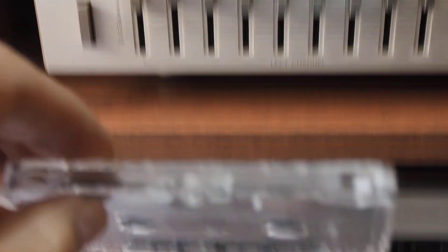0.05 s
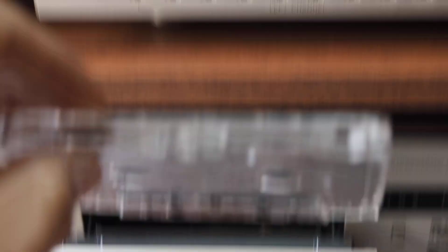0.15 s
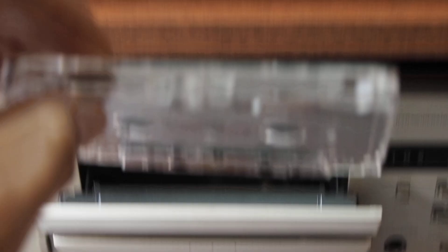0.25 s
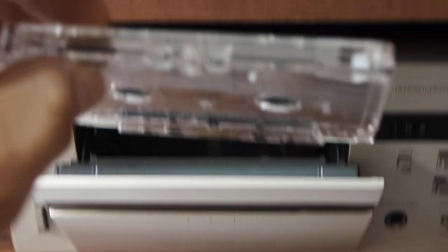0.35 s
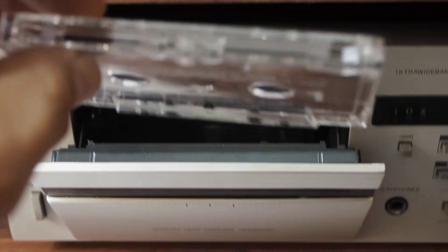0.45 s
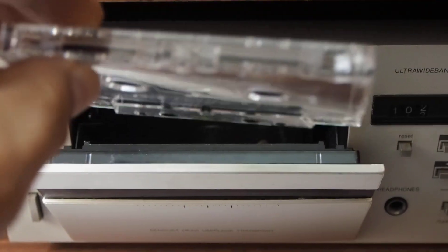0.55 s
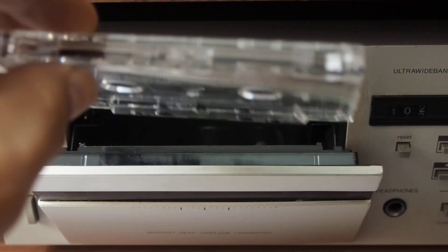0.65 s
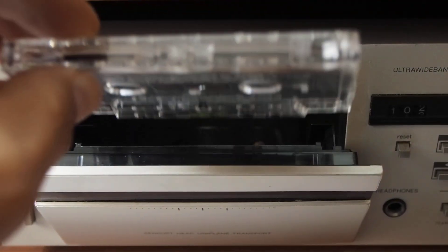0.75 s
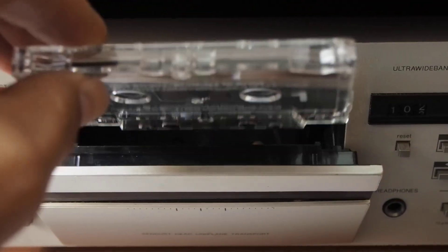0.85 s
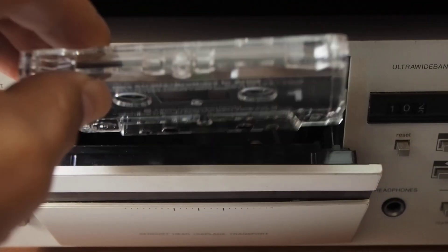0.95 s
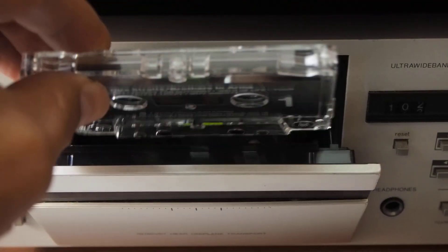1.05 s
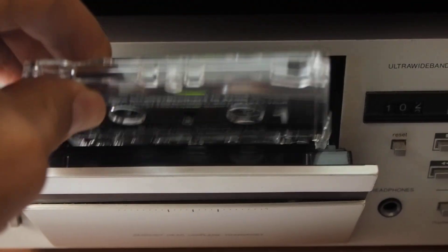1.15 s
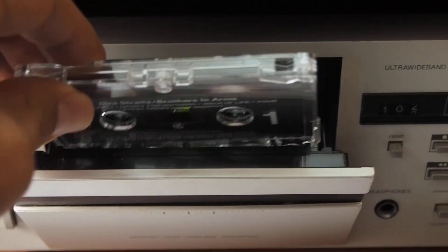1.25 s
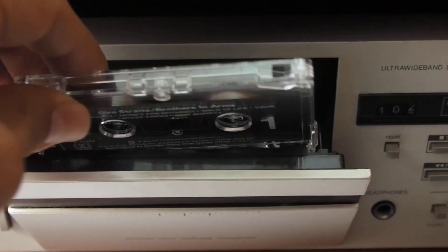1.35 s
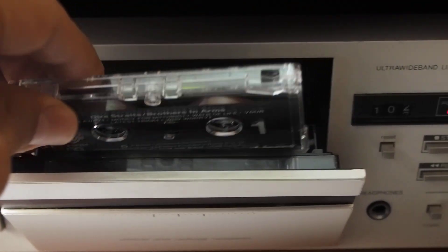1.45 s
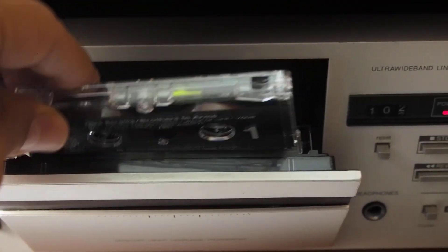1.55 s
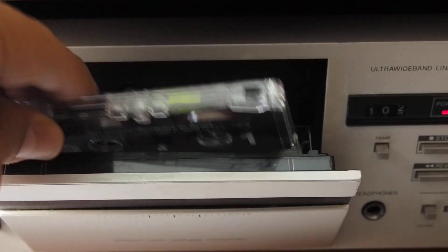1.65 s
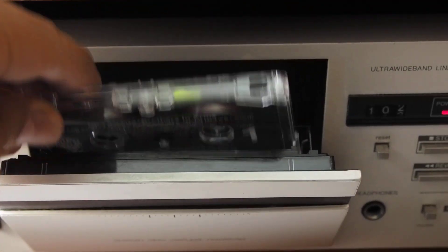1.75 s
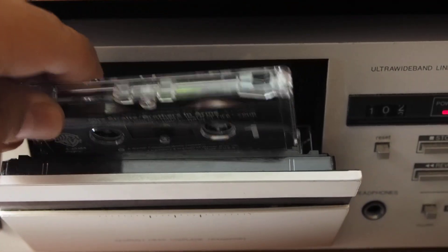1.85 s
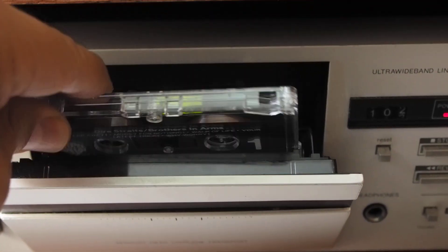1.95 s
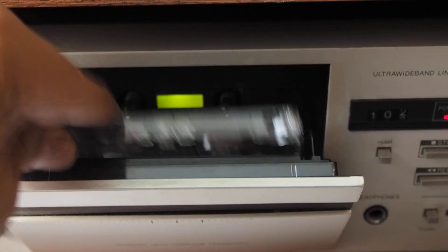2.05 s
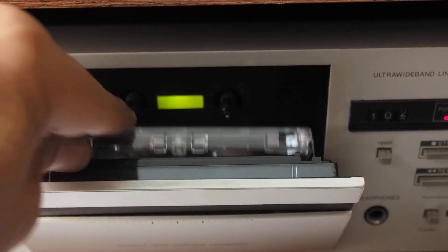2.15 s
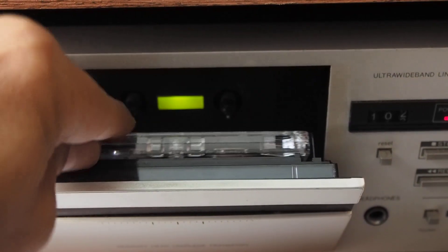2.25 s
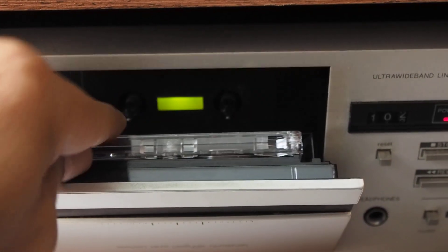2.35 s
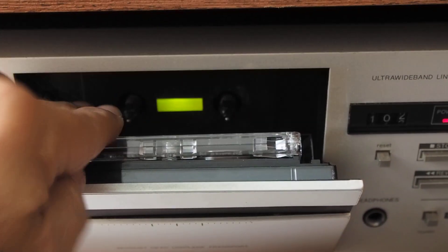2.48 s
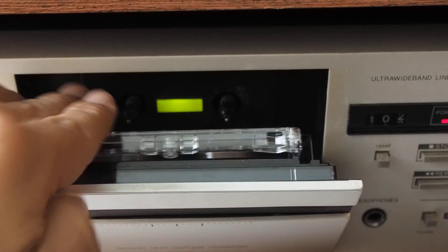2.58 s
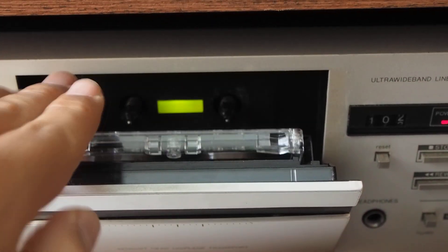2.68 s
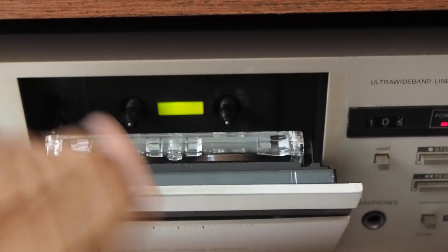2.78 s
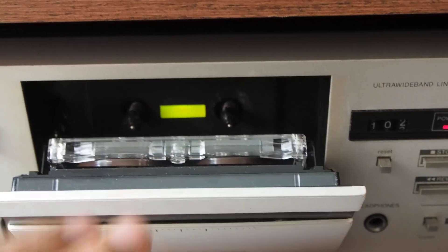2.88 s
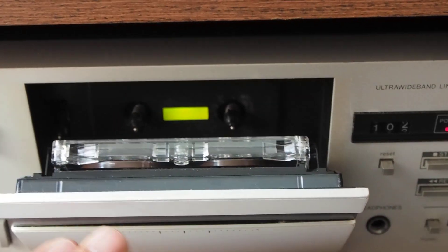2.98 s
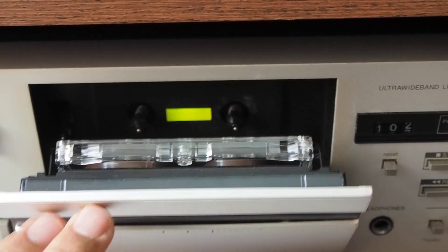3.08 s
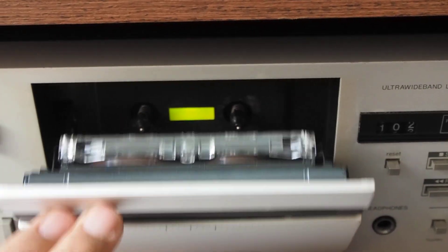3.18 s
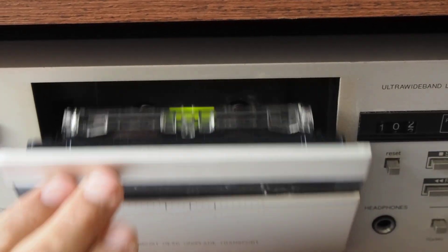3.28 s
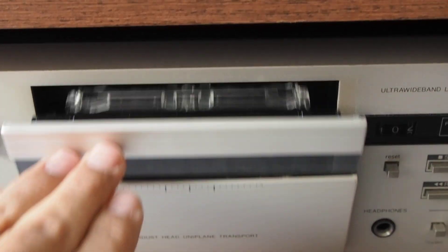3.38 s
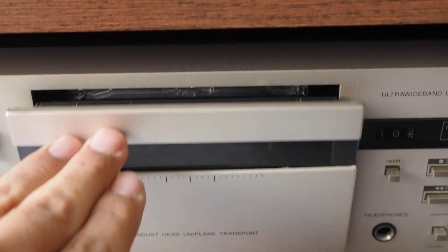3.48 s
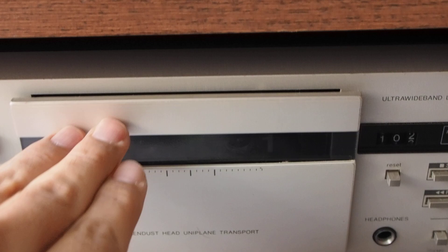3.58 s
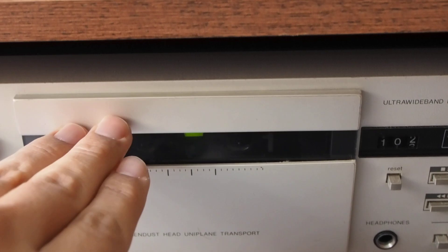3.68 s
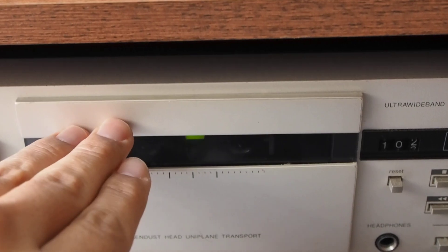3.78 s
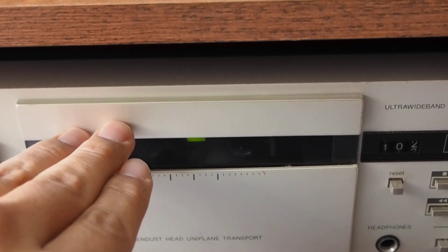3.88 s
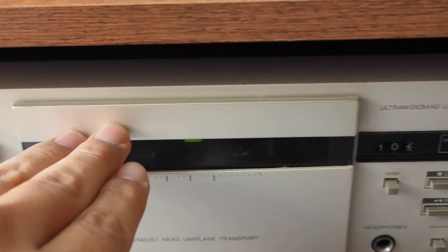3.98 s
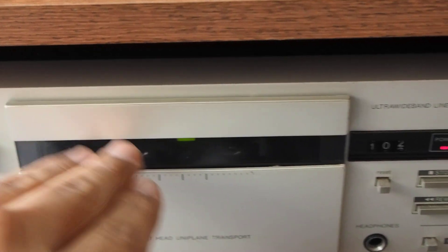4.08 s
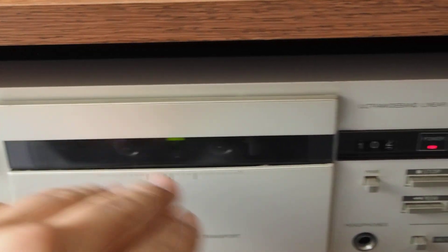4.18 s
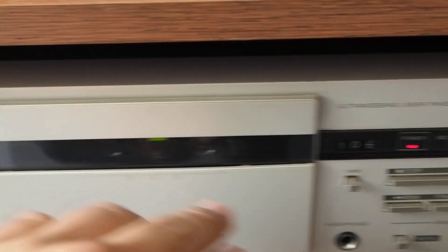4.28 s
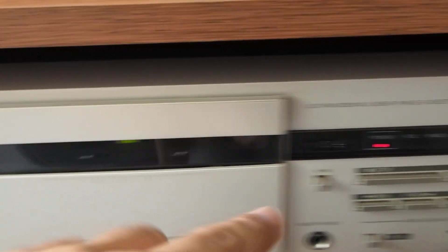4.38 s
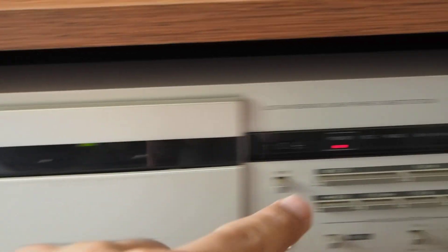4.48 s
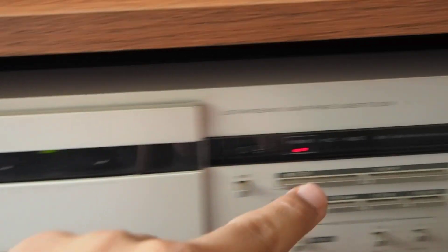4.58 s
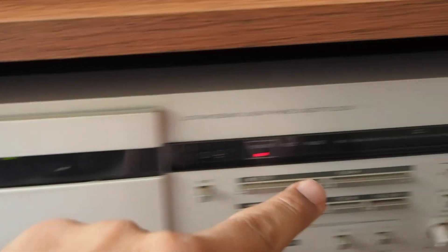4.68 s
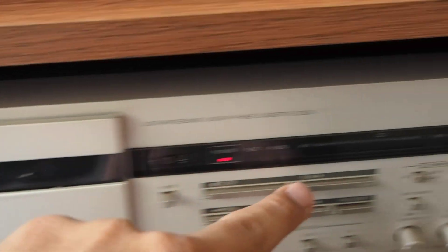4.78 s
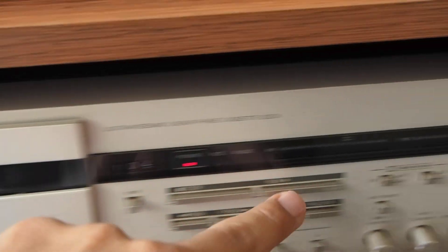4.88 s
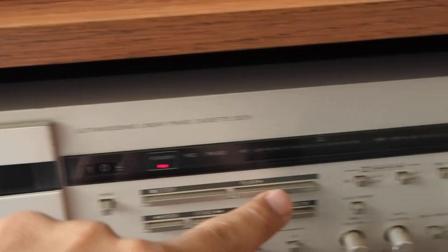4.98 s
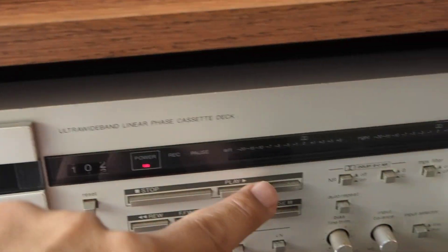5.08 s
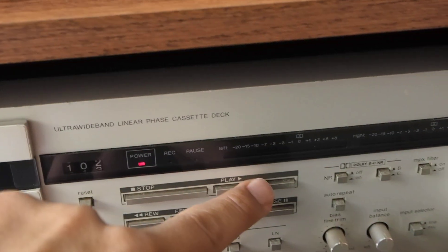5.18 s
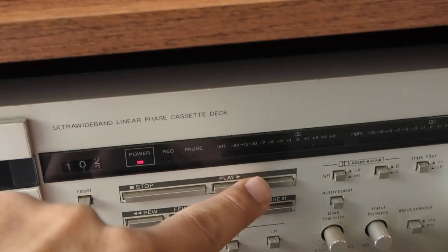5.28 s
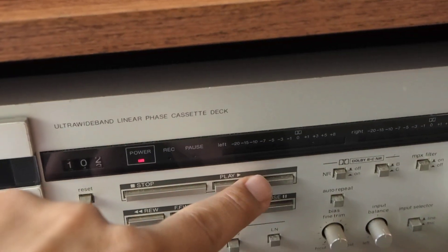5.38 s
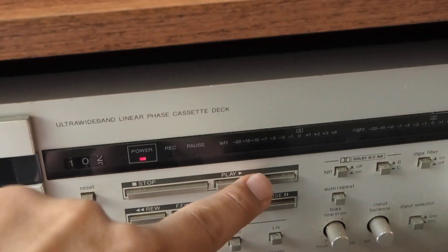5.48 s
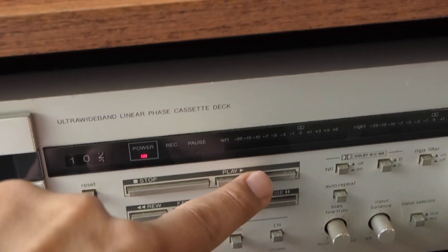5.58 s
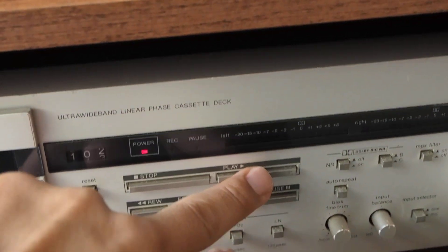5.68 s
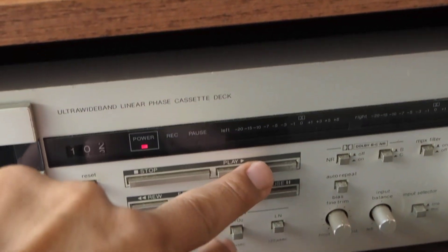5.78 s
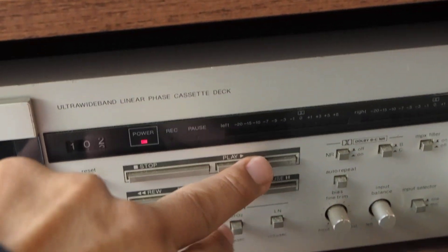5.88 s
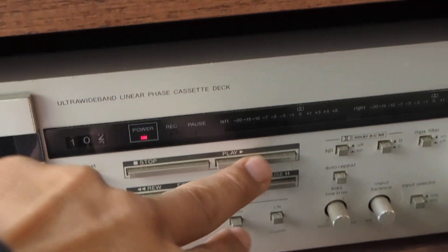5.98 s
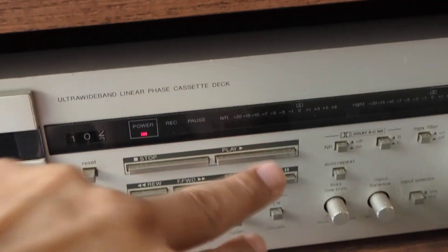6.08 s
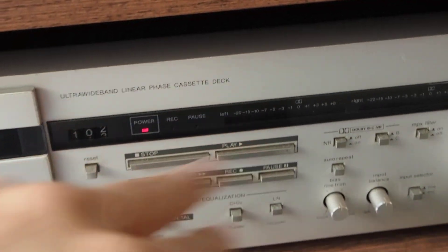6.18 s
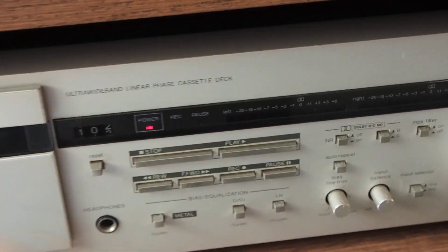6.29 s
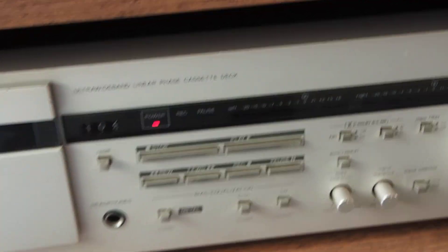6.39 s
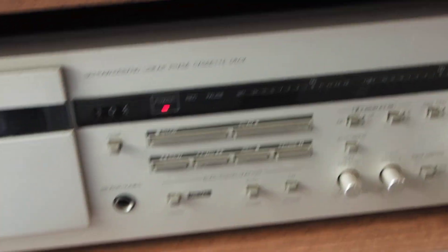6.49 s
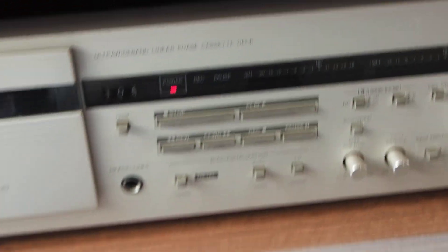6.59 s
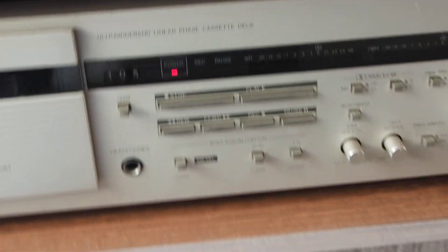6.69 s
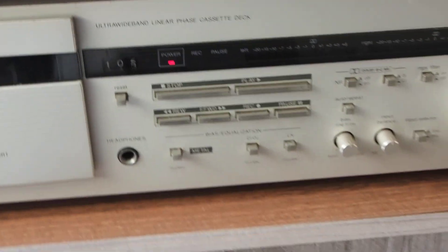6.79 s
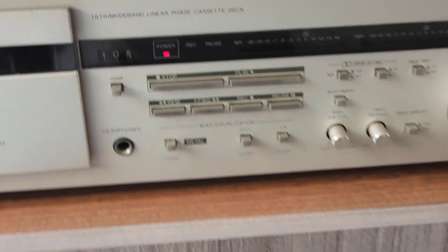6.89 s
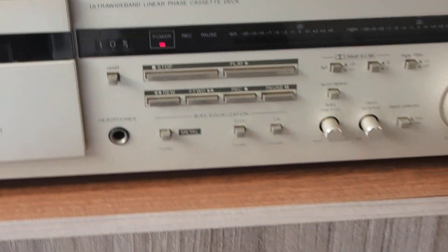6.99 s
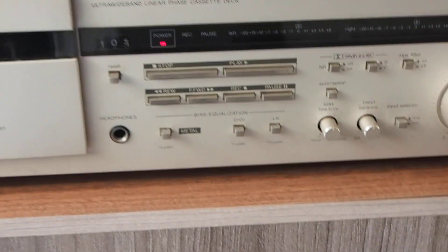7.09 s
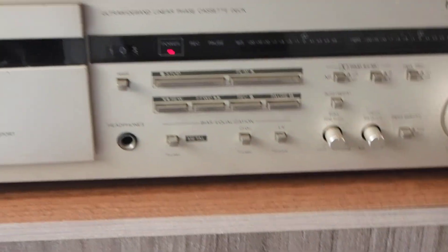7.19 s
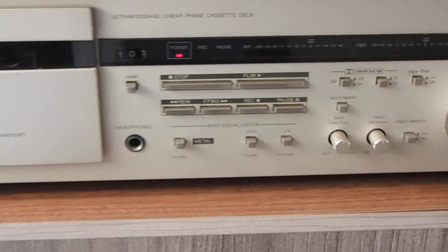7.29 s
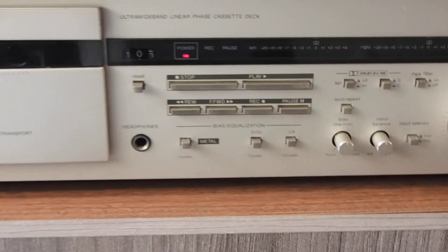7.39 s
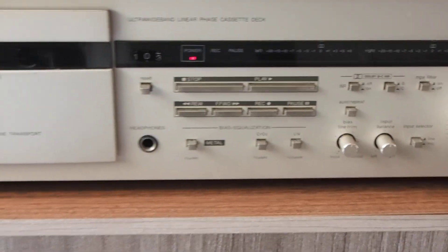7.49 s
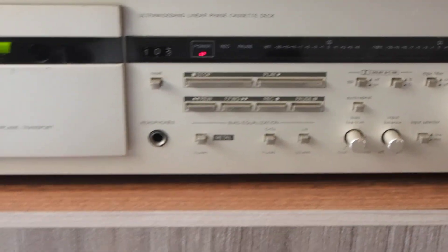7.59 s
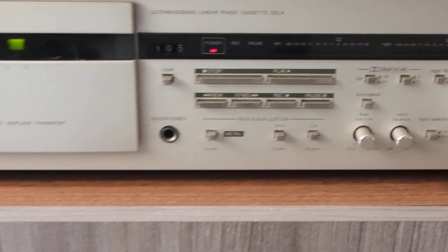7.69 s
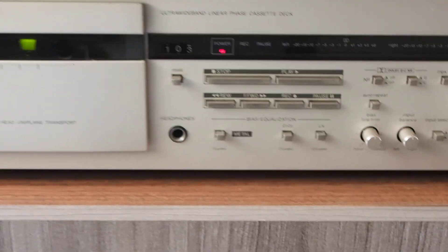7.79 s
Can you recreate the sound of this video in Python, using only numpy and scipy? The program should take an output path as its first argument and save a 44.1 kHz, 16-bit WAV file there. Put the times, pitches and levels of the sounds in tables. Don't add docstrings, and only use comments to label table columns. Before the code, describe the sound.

A quiet room with faint hiss and low, distant traffic opens the scene, recorded close with a hand-held stereo microphone. From 1.1 to 1.7 seconds a light plastic cassette knocks unevenly against its guides, clearest at 1.2. A bright snap at 1.8 and another at 1.9 lead to small rattles at 2.05-2.3, then a firm clack at 2.65 as it drops home. A thin snap comes at 3.1. The door moves from 3.2, rattles at 3.45-3.6 and latches at 3.66, the loudest hit, with a short boom. Quiet returns; a fingertip barely ticks at 5.1. The key goes down with a crisp double clack at 5.77, and transport clunks follow at 6.0 and 6.12. A far engine drones faintly from 6.7, dipping in pitch near 7.4. A tiny dry tick sounds at 7.3, then faint tape rubbing and a squeak around 7.55-7.7.

```python
import sys
import numpy as np
from scipy import signal
from scipy.fft import rfft, irfft, next_fast_len
from scipy.io import wavfile
from scipy.ndimage import uniform_filter1d

SR = 44100
rng = np.random.default_rng(int(sys.argv[2]) if len(sys.argv) > 2 else 0)


def wav_out(sig):
    wavfile.write(sys.argv[1], SR, np.round(np.clip(np.atleast_2d(sig).T, -1, 1) * 32767).astype(np.int16))


def rack_gain(trim_db):
    fader = np.asarray(trim_db, float)
    return 10 ** (fader / 20)


N = 346033

# (time [s], peak level [dB],
# hardness of contact [dB], rattle length [ms], pitch of the spot struck [Hz])
SHELL_KNOCKS = [(1.117, -32, -5.5, 11, 1650), (1.151, -32.5, -5.5, 2.5, 1490), (1.186, -21, 7, 2.6, 1645),
                (1.321, -34, -0.5, 6.7, 2580), (1.464, -25.5, 2, 2.3, 1400), (1.508, -31, -2, 3.9, 1740),
                (1.605, -43, -5, 4.6, 1930), (1.674, -37, 9.5, 1.5, 4450), (1.681, -30, -5.5, 9.6, 1350),
                (1.692, -33.5, -22, 3.9, 1240), (2.05, -35, -8, 9, 1380), (2.062, -31.5, -17, 9.9, 1520),
                (2.075, -29, 8.5, 1.6, 1750), (2.105, -41, -4, 3.5, 1730), (2.179, -32, 0, 6.6, 1680),
                (2.198, -32, -8, 2.1, 1500), (2.207, -30.5, 1, 2, 1460), (2.316, -42, -11, 9.3, 1410),
                (2.642, -18.5, 3.5, 2.9, 1450), (2.659, -24.5, -10, 5.6, 1330),
                (1.31, -40, 3.5, 1.5, 4600), (1.459, -32.5, 26, 2, 4480), (1.5, -36.5, 11, 4.8, 4500),
               (1.938, -42, -23, 3.4, 1480), (2.028, -45.5, 1, 34, 5200), (2.633, -46, 10, 8.2, 1500),
               (2.675, -31, -17, 7, 1940)]
DOOR_KNOCKS = [(3.239, -46, 4, 4.8, 1450), (3.293, -47.5, -3, 4.6, 1430), (3.443, -28.5, 0.5, 12.7, 1910),
               (3.509, -39, 8, 4.8, 5170), (3.555, -23, 4.5, 7.5, 2490), (3.599, -34.5, 1.5, 21, 1920),
               (3.657, -16, 9.5, 22.3, 1920), (3.664, -7.5, -1, 4.9, 1980), (3.685, -21.5, -5, 9.2, 1970),
               (3.706, -32.5, 20.5, 14, 2000), (3.975, -47, -20, 7.7, 1020), (3.985, -44.5, -3, 12, 980),
               (3.437, -44, -24, 4.2, 1840), (3.533, -39, 4, 4.3, 3300), (3.574, -46, 3, 9, 1500)]
KEY_KNOCKS = [
    (5.697, -32, -1, 9.2, 2040),
    (5.774, -13.5, 6, 2.6, 1700),
    (5.788, -18, -1, 9.1, 1560),
    (6.006, -27, -4.5, 8.1, 1440),
    (6.013, -31.5, 5, 5.7, 1910),
    (6.02, -28, -1, 4, 2720),
    (6.028, -42, 6, 3.4, 2820),
    (6.115, -28.5, 5.5, 8.4, 2700),
    (6.121, -22, -1, 4.9, 1990),
              (5.767, -33, 1, 7.9, 2540), (5.779, -43, 9, 2.6, 2300), (5.978, -44, -14, 8, 1920),
             (6, -33, -10, 2.1, 1890)]
SNAPS = [(1.775, -29.5, -1.5, 1.05, 4300), (1.942, -24.5, 1.5, 1.4, 3620), (3.119, -28, 4.5, 0.9, 4480),
         (3.124, -39.5, 7, 12, 2700), (5.091, -39.5, 3.5, 1.06, 5440)]
FINGER_TAPS = [
    (5.099, -43, -2, 19, 2100),
    (5.472, -47, -22, 3.7, 895),
]
CAMERA_TICK = [(7.304, -37, 0, 0.71, 5440)]
# (frequency [Hz], level [dB per Hz])
SHELL_COLOUR = [(310, -60), (520, -30.5), (766, -10), (835, -19), (950, -6.5), (1190, -3), (1300, -11),
                (1440, -1.5), (2990, -5), (4340, -6.5), (6480, -15), (8160, -10), (12500, -25.5),
                (16000, -35)]
DOOR_COLOUR = [(310, -67), (520, -29.5), (811, -14), (991, -3), (1260, -11.5), (1360, -4.5), (1680, -7.5),
               (1940, -5.5), (2210, -12), (2410, -4), (6580, -16), (8890, -13.5), (12700, -23.5),
               (16000, -40)]
KEY_COLOUR = [(350, -62), (600, -20.5), (1130, -3.5), (1470, -13), (1640, -2), (2010, -11), (2500, -4),
              (3040, -8.5), (3300, -9.5), (5630, -15.5), (10300, -13), (11700, -19), (12800, -18),
              (16000, -37)]
SNAP_COLOUR = [(500, -38), (1000, -14), (1600, -12), (2600, -7.5), (4200, -5.5), (6500, -14.5), (8500, -8),
               (12000, -21.5), (16000, -34)]
# (frequency [Hz], level [dB], time to fall 60 dB [s])
SHELL_MODES = [(943, 4, 0.18), (1199, 7.5, 0.12), (1650, -12, 0.038), (1920, 8, 0.11), (2410, 16, 0.062)]
DOOR_MODES = [(975, -10, 0.058), (1380, -9.5, 0.064), (1945, -1, 0.08), (1995, -2, 0.055),
              (2390, -13, 0.046), (2890, -7, .06), (12520, -12, 0.06)]
KEY_MODES = [(1592, 2.5, 0.061), (1876, 0.5, 0.064), (2880, -15, .06)]
# (time [s], peak level
# [dB], frequency [Hz])
THUMPS = [(1.121, -49.5, 193.5), (1.19, -53, 139), (1.472, -57, 190), (1.62, -58, 124),
          (2.191, -50.5, 124.4), (2.21, -50.5, 199), (2.645, -43, 150), (3.442, -52.5, 124),
          (3.561, -54.5, 196), (3.667, -46.5, 127.7), (3.679, -38, 185), (3.98, -68, 116),
          (5.773, -57, 140), (6.01, -50, 185), (6.119, -41, 191), (7.303, -56, 107.4)]
# (start of hold [s], hold [s], level [dB])
WHIRR_SWELLS = [(7.42, .02, -66), (7.55, 0.14, -56.5)]
# (frequency [Hz], width [Hz], level [dB])
WHIRR_PEAKS = [(1064, 29, -6), (1625, 52, 8.5), (1910, 39, 5.5), (2300, 200, -4), (3570, 34, -9)]
# (start of hold [s], hold [s], level [dB])
SQUEAK_SWELLS = [(7.6, .005, -63), (7.67, 0.067, -60)]
# (frequency [Hz], time [s])
ROOM_T60 = [(150, 0.48), (700, 0.38), (2000, 0.28), (5000, 0.41), (12000, 0.25)]
# (frequency [Hz], likeness [-1 to 1])
ROOM_LIKENESS = [(200, 0.99), (1400, 0.73), (3000, 0.05), (7000, 0.0072)]
# (start of hold [s], hold [s], level [dB])
HOLLOW_SWELLS = [(2.534, .01, -59.5), (2.674, 0.011, -62), (2.774, 0.005, -69.5), (2.986, 0.037, -61.5)]
# (time [s], frequency [Hz], level [dB])
DRONE = [(6.7, 88.1, -76), (6.9, 89, -61.5), (7.368, 89.6, -64.5), (7.44, 76, -73), (7.604, 78, -69),
         (7.78, 87, -61)]
# (start of hold [s], hold [s], level [dB])
MURMUR_SWELLS = [(7.4, 0.1, -68.5)]
# (time [s], level [dB])
TRAFFIC_LEVEL = [(0, 1.2), (4.1, 1.5), (5.3, 0.5), (6.4, 1.96), (7.85, 3.5)]
# (frequency [Hz], level [dB per Hz])
RUMBLE_COLOUR = [(21, -38), (35, -11), (64, -6.5), (91, -7), (119, 1), (146, -3), (280, -4.5), (600, -18.5),
                 (780, -36), (1320, -120)]
HISS_COLOUR = [(290, -55), (500, -22.5), (679, -6.5), (808, -6), (1010, 0), (1150, 1.5), (1360, -4),
               (1940, -1), (2740, -4), (3670, -3.5), (6770, -13.5), (8920, -8), (10600, -12.5),
               (12600, -7.5), (16200, -15)]
# (frequency [Hz], likeness [-1 to 1])
LIKENESS = [(60, 1), (180, 0.58), (550, 0.23), (1650, 0.29), (4970, -0.21), (15000, -0.068)]
# (start of hold [s], hold [s], level [dB])
AIR_PUFF = [(4.8, .15, 2.5)]
# (frequency [Hz], level [dB])
MAINS = [(60, -72), (120, -88)]

BANDS = 40 * 2 ** np.arange(0, 9.5)
PLASTIC_RING_DB = -58


def struck(knocks, colour, modes, dense_t60, clear_db, spread_ms, contacts_per_s, level_db, pan_db):
    crack = 4.18
    body_loss = 0.18
    upper_follows, top_follows = 0.87, 1.23
    top_with_force = 0.24
    ring_follows = 0.45
    out, t, size = np.zeros((2, N)), np.arange(SR // 10) / SR, 2 ** 13
    hz = np.maximum(np.fft.rfftfreq(size, 1 / SR), 1)
    mode_hz, mode_db, mode_t60 = np.transpose(modes)
    decay = np.log(1000) / np.clip(mode_t60, .02, .2)
    rings = np.exp(np.outer(2j * np.pi * mode_hz - decay, t))

    lag = np.interp(hz, np.linspace(0, SR / 2, 60), rng.standard_normal(60) + .5) * spread_ms / 1000
    ports = np.exp(1j * np.pi * hz * lag * [[1], [-1]]) * rack_gain([[pan_db / 2], [-pan_db / 2]])
    strongest = max(row[1] for row in knocks)
    loud_band = signal.butter(2, [700, 3000], "band", fs=SR, output="sos")

    for s, db, hard_db, rattle_ms, spot_hz in knocks:
        strength, phase = rng.standard_normal((2, len(modes)))
        when, force, mesh = rng.random((3, len(t)))
        weaker_db = db - strongest
        contacts = (when < contacts_per_s / SR) * (2 * force - 1)
        contacts = contacts * np.exp(-t * 1000 / max(rattle_ms, .2))
        contacts[0] = 0.5
        rattle = rfft(contacts, size)
        short_modes = (2 * mesh - 1) * rack_gain(-60 * t / dense_t60) + crack * (t == 0)
        dense = rattle * rfft(short_modes, size)

        lumps_db = 10 * np.log10(uniform_filter1d(np.abs(dense) ** 2, size=45) + 1e-20)
        spot_db = 8.4 * np.exp(-(np.log(hz / spot_hz) / 0.063) ** 2)
        tilt_db = at_hz([(900, -body_loss * hard_db), (2500, 0.022),
                         (3800, upper_follows * hard_db), (5500, upper_follows * hard_db),
                         (8000, top_follows * hard_db + top_with_force * weaker_db)], hz)

        ring_level = rack_gain(mode_db + clear_db + ring_follows * weaker_db + 2 * strength)
        clear = np.imag((ring_level * np.exp(3j * phase)) @ rings)
        clear = clear * np.clip(t / 0.00033, 0, 1)
        clear = rfft(clear, size) * rattle / np.sqrt(np.sum(contacts ** 2))

        body = dense * causal(at_hz(colour, hz) + spot_db - lumps_db) + clear
        sound = irfft(body * causal(tilt_db) * ports)[:, :size - SR // 20]
        peak = np.abs(signal.sosfilt(loud_band, sound.mean(0))).max()
        add(out, s, sound / peak * rack_gain(db + level_db))
    return out


def shell():
    return struck(SHELL_KNOCKS, SHELL_COLOUR, SHELL_MODES, dense_t60=0.025,
                  clear_db=PLASTIC_RING_DB, spread_ms=0.062, contacts_per_s=3000, level_db=-0.0096, pan_db=-1.7)


def door():
    return struck(DOOR_KNOCKS, DOOR_COLOUR, DOOR_MODES, dense_t60=0.022,
                  clear_db=-41.5, spread_ms=0.041, contacts_per_s=4000, level_db=-0.86, pan_db=-1.7)


def key():
    return struck(KEY_KNOCKS, KEY_COLOUR, KEY_MODES, dense_t60=0.025,
                  clear_db=-43.5, spread_ms=0.046, contacts_per_s=4000, level_db=-1.66, pan_db=-0.47)


def sharp_snaps():
    return struck(SNAPS, SNAP_COLOUR, SHELL_MODES, dense_t60=0.017,
                  clear_db=PLASTIC_RING_DB, spread_ms=0.039, contacts_per_s=5900, level_db=-1.2, pan_db=-1.7)


def finger_taps():
    return struck(FINGER_TAPS, SHELL_COLOUR, SHELL_MODES, dense_t60=0.014,
                  clear_db=-76, spread_ms=0.043, contacts_per_s=2300, level_db=0, pan_db=-.5)


def camera_tick():
    return struck(CAMERA_TICK, SNAP_COLOUR, SHELL_MODES, dense_t60=.008,
                  clear_db=-70, spread_ms=0.063, contacts_per_s=5000, level_db=-1.5, pan_db=.4)


def cabinet():
    out, t = np.zeros((2, N)), np.arange(SR // 4) / SR
    push = (1 - np.exp(-t / 0.0026)) ** 2
    for s, db, hz in THUMPS:
        turn = 2 * np.pi * hz * t
        panels = np.sin(turn) + 0.58 * np.sin(1.5 * turn) + 0.22 * np.sin(1.62 * turn)
        boom = rack_gain(db - 60 * t / 0.15) * push * panels
        add(out, s - .008, boom * [[1], [1]])
    return out


def whirr():
    grains = (rng.random(N) < 2500 / SR) * rng.standard_normal(N) * rack_gain(1.8 * drift(40))
    start, out = round(WHIRR_SWELLS[0][0] * SR), np.zeros(N)
    for hz, width_hz, db in WHIRR_PEAKS:
        r = np.exp(-np.pi * width_hz / SR)
        poles = [1, -2 * r * np.cos(2 * np.pi * hz / SR), r * r]
        out[start:] += rack_gain(db) * rms_one(signal.lfilter([1, 0, -1], poles, grains[start:]))
    out[start:] = rms_one(out[start:])
    return out * rack_gain(swells(WHIRR_SWELLS, 400, 80))


def spindle_squeak():
    return rack_gain(swells(SQUEAK_SWELLS, 600, 700)) * narrow_noise(3100, 28)


def room(dry):
    t = np.arange(SR // 2) / SR
    colour = [(300, 6), (900, 1.0), (2000, 3.5), (4300, -4.0), (6500, -4.0), (9000, 4.0), (13000, 1.5)]
    bands = stereo_bands(len(t), ROOM_LIKENESS, colour, BANDS)
    tail = sum(band * rack_gain(-60 * t / at_hz(ROOM_T60, hz)) for hz, band in bands)
    tail = tail * np.clip(t / 0.0052, 0, 1)
    return signal.oaconvolve(dry[:1], tail / np.sqrt(np.sum(tail ** 2) / 2), axes=1)[:, :N]


def hollow():
    return rack_gain(swells(HOLLOW_SWELLS, 360, 200)) * narrow_noise(335, 11)


def far_engines():
    arrives = np.clip((np.arange(N) / SR - DRONE[0][0] + 0.32) / .2, 0, 1)
    drone = rack_gain(in_time(DRONE, 2)) * narrow_noise(in_time(DRONE, 1), 25) * arrives
    return drone + rack_gain(swells(MURMUR_SWELLS, 150, 40)) * narrow_noise(248, 11)


def background():
    traffic_db = in_time(TRAFFIC_LEVEL, 1)
    air_db = np.maximum(swells(AIR_PUFF, 18, 16), 0.04)
    rumble = sum(band * rack_gain(0.77 * drift(9.5))
                 for hz, band in stereo_bands(N, LIKENESS, RUMBLE_COLOUR, BANDS[:4]))
    hiss = sum(band * rack_gain((air_db if hz < 1400 else traffic_db) + 0.051 * drift(2.86))
               for hz, band in stereo_bands(N, LIKENESS, HISS_COLOUR, BANDS[4:9]))
    hum = sum(rack_gain(db) * np.sin(2 * np.pi * hz * np.arange(N) / SR) for hz, db in MAINS)
    return rack_gain(-66.5 + 0.38 * traffic_db) * rumble + rack_gain(-58.5) * hiss + hum


def rms_one(x):
    return x / np.sqrt(np.mean(x ** 2) + 1e-20)


def in_time(rows, column):
    return np.interp(np.arange(N) / SR, np.array(rows)[:, 0], np.array(rows)[:, column])


def at_hz(points, hz):
    return np.interp(np.log(hz), np.log(np.array(points)[:, 0]), np.array(points)[:, 1])


def swells(rows, rise_db_per_s, fall_db_per_s):
    t = np.arange(N) / SR
    levels = []
    for s, hold, db in rows:
        rise = rise_db_per_s * np.maximum(s - t, 0)
        fall = fall_db_per_s * np.maximum(t - s - hold, 0)
        levels.append(db - rise - fall)
    return np.max(levels, axis=0)


def drift(rate):
    knots = rng.standard_normal(400)
    return np.interp(np.arange(N) / SR * rate, np.arange(400), knots)


def narrow_noise(hz, width_hz):
    r = np.exp(-np.pi * width_hz / SR)
    noise = rng.standard_normal(N) + 1j * rng.standard_normal(N)
    slow = signal.lfilter([1], [1, -2 * r, r * r], noise)
    carrier = np.exp(2j * np.pi * np.cumsum(hz * np.ones(N)) / SR)
    return rms_one(np.real(slow * carrier))


def stereo_bands(size, likeness, colour, centres):
    length = next_fast_len(size)
    hz = np.maximum(np.fft.rfftfreq(length, 1 / SR), 1)
    mid, side = rfft(rng.standard_normal((2, length))) * rack_gain(at_hz(colour, hz))
    alike = np.clip(at_hz(likeness, hz), -1, 1)
    pair = np.sqrt(1 + alike) * mid + np.sqrt(1 - alike) * side * [[1], [-1]]
    pair = pair * len(hz) ** .5 / np.sqrt(np.mean(np.abs(pair) ** 2)) * 2 ** .5
    for k, centre in enumerate(centres):
        share = np.interp(np.log(hz), np.log(centres), np.arange(len(centres)) == k)
        yield centre, irfft(pair * share)[:, :size]


def causal(gain_db):
    cepstrum = irfft(gain_db * np.log(10) / 20)
    half = len(cepstrum) // 2
    return np.exp(rfft(cepstrum * np.r_[1, 2 * np.ones(half - 1), 1, np.zeros(half - 1)]))


def add(out, s, sound):
    at = round(s * SR)
    out[:, at:at + sound.shape[1]] += sound[:, :N - at]


def scene():
    near = shell() + door() + key() + finger_taps() + cabinet() + whirr() + spindle_squeak()
    snaps = sharp_snaps()
    reflections = room(rack_gain(-3.5) * near + rack_gain(-2.0) * snaps)
    return near + snaps + reflections + camera_tick() + hollow() + far_engines() + background()


def roll_off(x):
    return signal.sosfilt(signal.butter(12, 16670, fs=SR, output="sos"), x)


def record(dry):
    cut = signal.sosfilt(signal.cheby2(10, 50, 16500, fs=SR, output="sos"), dry)
    return roll_off(cut - 0.0044)


dry = scene()
out = record(dry)
wav_out(out)
```